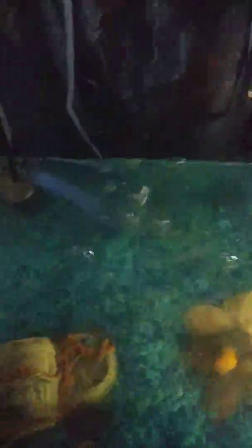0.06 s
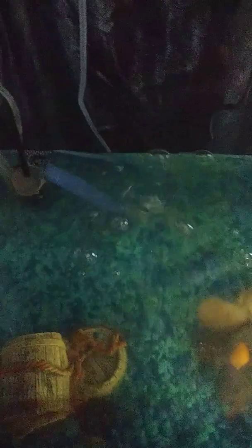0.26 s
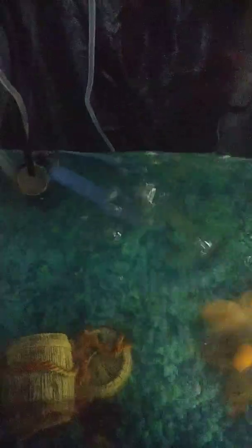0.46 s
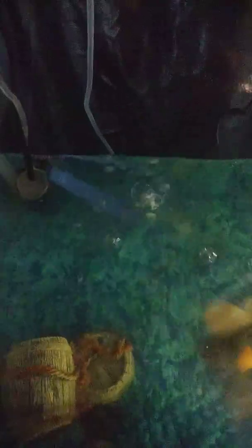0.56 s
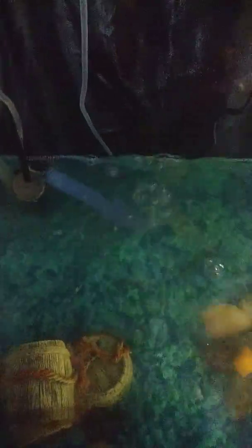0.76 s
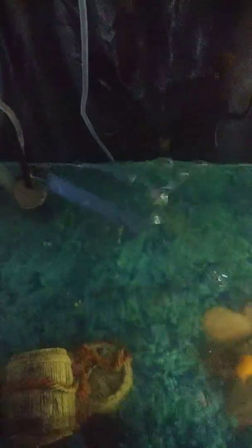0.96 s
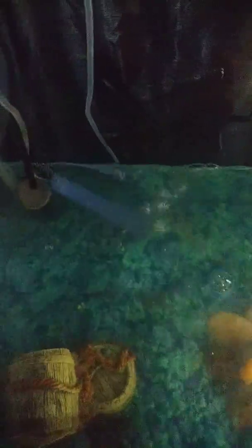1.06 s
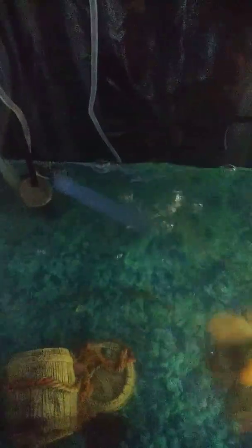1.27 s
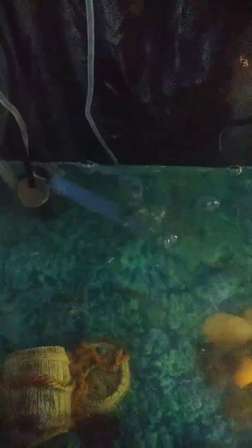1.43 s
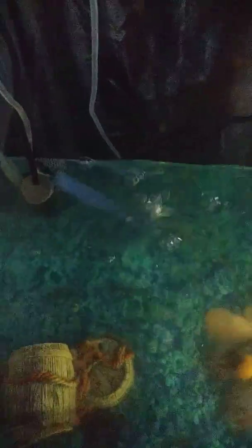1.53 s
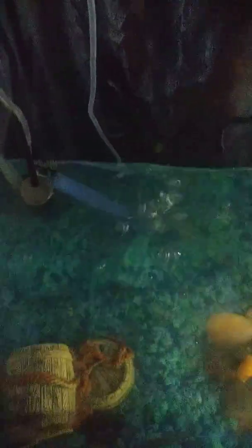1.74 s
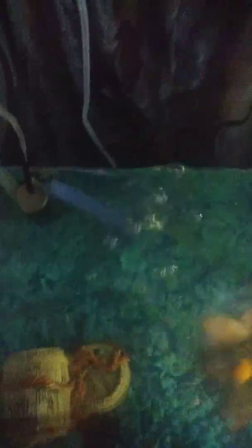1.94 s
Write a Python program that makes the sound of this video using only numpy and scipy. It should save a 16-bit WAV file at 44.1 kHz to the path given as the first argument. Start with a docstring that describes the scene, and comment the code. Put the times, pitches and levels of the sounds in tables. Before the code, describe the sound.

Water gurgles close up in a home fish tank, with air glugging rapidly throughout. From 0.2 seconds it sloshes and bubbles, peaking in a deep plop at 0.4, then eases to a soft trickle after 0.8. A brighter plop and splash come at 1.6, with a few hard drops ticking on the tank between 1.4 and 2 seconds. A faint pump hum and hiss lie underneath in a small room.

```python
"""Water gurgling in a home fish tank, close up. Air glugs through it about 15 times a second, each
pocket a sagging tone that rings the hollow above the water. The surface sloshes twice, with plops,
ringing bubbles and splashes made of tiny bubbles, and trickles on in between. Late on, a few hard
drops tick on the tank. A small room rings lightly; a pump hum and a faint hiss lie underneath."""
import sys
import numpy as np
from scipy import signal
from scipy.fft import rfft, irfft, next_fast_len
from scipy.io import wavfile
from scipy.ndimage import map_coordinates

SR = 44100
rng = np.random.default_rng(int(sys.argv[2]) if len(sys.argv) > 2 else 0)


def unload_wav(signal):
    """Save mono or channel-first audio to the path in sys.argv[1] as 16-bit WAV at rate SR, clipped to [-1, 1]."""
    wavfile.write(
        sys.argv[1],
        SR,
        np.round(np.clip(np.atleast_2d(signal).T, -1, 1) * 32767).astype(np.int16),
    )


N = 88200
BUBBLE_RISE_S, BUBBLE_T60_S = 0.001, 0.038


def amp(db):
    """Decibels to gain."""
    return 10 ** (np.asarray(db) / 20)


def unit(x):
    """Scale to rms 1."""
    return x / np.sqrt(np.mean(x ** 2) + 1e-20)


def along(points, hz):
    """Read a curve of (freq_hz, value) points on a log frequency axis."""
    freqs, values = np.transpose(points)
    return np.interp(np.log(hz + 1), np.log(freqs + 1), values)


def curves(rows):
    """Automation: one value per sample for each column after the time."""
    times, *columns = np.transpose(rows)
    return [np.interp(np.arange(N) / SR, times, column) for column in columns]


def wobble(rate_hz, size):
    """A smooth random curve with rate_hz knots a second."""
    return map_coordinates(rng.standard_normal(2048), [np.arange(size) * rate_hz / SR], mode="mirror")


def filtered(x, response):
    """Equalise x with a gain given as a function of frequency."""
    size = next_fast_len(N + SR // 2)
    return irfft(rfft(x, size) * response(np.fft.rfftfreq(size, 1 / SR)), size)[:N]


def coloured(x, colour):
    """x through an EQ curve of (freq_hz, gain_db) points, at rms 1."""
    return unit(filtered(x, lambda hz: amp(along(colour, hz))))


def add(track, start_s, sound):
    """Mix a sound into the track."""
    part = track[max(0, round(start_s * SR)):][:len(sound)]
    part += sound[:len(part)]


def event_time():
    """Time axis of one short event, in seconds."""
    return np.arange(SR // 4) / SR


def envelope(rise_s, hold_s, t60_s):
    """Attack, hold and exponential release."""
    t = event_time()
    attack = 1 - np.exp(-t / rise_s)
    return attack * np.exp(-np.log(1000) * np.maximum(t - hold_s, 0) / t60_s)


def tone(hz, waver_rad, octaves_per_s=0):
    """A sine that wavers in phase; any glide stops after 45 ms."""
    t = event_time()
    pitch_hz = hz * 2 ** (octaves_per_s * np.minimum(t, .045))
    return np.sin(2 * np.pi * np.cumsum(pitch_hz) / SR + waver_rad * wobble(231.6, len(t)))


def fizz(low_hz, high_hz, decay_cycles, spread_db, count):
    """A swarm of tiny bubbles, each a damped sine of random onset, pitch and size."""
    when, pitch, size = rng.random((count, 3)).T
    hz = low_hz * (high_hz / low_hz) ** pitch[:, None]
    gain = amp(-spread_db * np.log(1 - .98 * size))[:, None]  # many quiet, a few loud
    age = np.arange(SR // 100)
    cycles = hz * age / SR
    grains = gain * np.sin(2 * np.pi * cycles) * np.exp(-cycles / decay_cycles)
    positions = (when * N).astype(int)[:, None] + age
    return np.bincount(positions.ravel(), grains.ravel())[:N]


def glass_walls(x, gain=.42, latest_s=.008, count=9):
    """Quick echoes between the glass walls ripple the spectrum."""
    echoes = sum(np.sign(polarity - .5) * np.roll(x, int(delay * latest_s * SR))
                 for delay, polarity in rng.random((count, 2)))
    return x + gain * echoes


def water_textures():
    """Spray, hollow slap and mist: swarms of middling, large and minute bubbles."""
    # EQ of each swarm: freq_hz, gain_db
    spray_eq = [(1200, -60), (1800, -19.5), (2300, -5.5), (3200, 1.5), (4100, 1), (4900, -2.5), (5800, -15),
                (9000, -45)]
    slap_eq = [(700, -50), (1000, -20), (1350, -0.5), (1600, 0.5), (2100, 3.5), (2800, -19.5), (5000, -61)]
    mist_eq = [(3000, -46), (5200, -4), (6500, -4), (8000, -6), (9600, -15), (12000, -17), (14000, -9),
               (15800, -17)]
    spray = glass_walls(fizz(1908.5, 5784, decay_cycles=14, spread_db=3, count=10000))
    slap = glass_walls(fizz(841, 2375, decay_cycles=4.8, spread_db=3, count=3000))
    mist = glass_walls(fizz(5010, 18000, decay_cycles=6.2, spread_db=7.5, count=8000))
    return coloured(spray, spray_eq), coloured(slap, slap_eq), coloured(mist, mist_eq)


def trickle(crossover_hz=3280):
    """A fluttering wash of tiny bubbles that swells and brightens with each slosh, then settles."""
    # fader moves of the wash: time_s, dark_spray_db, bright_spray_db, slap_db, mist_db
    faders = [(0.0, -73, -79, -71, -74.5), (0.14, -66, -78, -92, -82.5), (0.27, -66, -54.5, -54, -79.5),
              (0.39, -58, -50.5, -52, -64.5), (0.46, -53, -46.5, -62, -59.5),
              (0.54, -53.5, -57.5, -65, -60.5), (0.68, -54.5, -59, -79, -71.5),
              (0.77, -56.5, -58, -61, -77), (0.89, -55.5, -59.5, -85, -72),
              (0.96, -59.5, -57, -66.5, -66.5), (1.09, -61.5, -68, -83.5, -78),
              (1.16, -66, -69.5, -84, -90), (1.35, -62.5, -97, -74.5, -75.5),
              (1.41, -60.5, -66.5, -94, -79.5), (1.53, -66, -63.5, -78.5, -68),
              (1.6, -56, -57, -49.5, -57.5), (1.73, -60.5, -57.5, -57, -74),
              (1.82, -64.5, -59.5, -59.5, -72), (2.0, -58, -53.5, -53.5, -62.5)]
    # trim on each fader: dark_spray_db, bright_spray_db, slap_db, mist_db
    trims = [1, 1, 0, 0]
    flutter_db = 1.2 * wobble(rate_hz=70, size=N)
    spray, slap, mist = water_textures()
    dark_spray = filtered(spray, lambda hz: 1 / (1 + (hz / crossover_hz) ** 20))
    layers = unit(dark_spray), unit(spray - dark_spray), slap, mist
    return sum(amp(level_db + trim_db + flutter_db) * layer
               for level_db, trim_db, layer in zip(curves(faders), trims, layers))


def pump():
    """The pump's mains hum, drifting in phase, and the low murmur of moving water in the tank."""
    # partials of the hum: pitch_hz, rms_db
    partials = [(60, -86.5), (120, -85.5), (240, -64), (480, -72), (630, -72.5), (690, -69.5)]
    # EQ of the murmur: freq_hz, gain_db
    murmur_eq = [(25, -28.5), (60, -49), (100, -28), (150, -31.5), (220, 5), (290, -25), (380, -2),
                 (540, -13), (670, 0), (800, -20.5), (1100, -29), (1500, -60), (4000, -75.5)]
    # swell of the murmur: time_s, rms_db
    murmur_fader = [(0, -62.5), (.18, -65.5), (.25, -51), (.6, -50), (.85, -62.5), (1.4, -59), (2, -67.5)]
    t = np.arange(N) / SR
    hum = sum(amp(rms_db) * np.sqrt(2) * np.sin(2 * np.pi * hz * t + 0.92 * wobble(6.1, N))
              for hz, rms_db in partials)
    murmur = amp(curves(murmur_fader)[0]) * coloured(rng.standard_normal(N), murmur_eq)
    return hum + murmur


def hiss(level_db=-85.5):
    """Faint, even microphone hiss."""
    # EQ of the hiss: freq_hz, gain_db
    hiss_eq = [(1000, -35), (6000, -6), (9500, -10), (13000, 3), (16000, -2)]
    return amp(level_db) * coloured(rng.standard_normal(N), hiss_eq)


def glugs(rise_s=0.00339, hold_s=0.0094, sag_octaves_per_s=6.1, thump_db=-15.5):
    """Each pocket of air sags in pitch and rings the hollow; water thumps softly shut behind it."""
    # pockets of air: time_s, level_db, pitch_hz (at the end of the hold)
    pockets = [(0.04, -49.5, 290), (0.105, -44, 377), (0.172, -41.5, 398), (0.229, -32, 414),
               (0.275, -31, 459), (0.301, -31, 475), (0.33, -29, 388), (0.482, -41.5, 407),
               (0.546, -29.5, 405), (0.599, -38, 554), (0.665, -46, 404), (0.737, -43, 401),
               (0.801, -42.5, 415), (0.867, -45, 410), (0.939, -45.5, 385), (1.004, -45.5, 366),
               (1.077, -45, 387), (1.138, -46, 357), (1.206, -50, 400), (1.266, -49.5, 415),
               (1.343, -52, 405), (1.407, -47, 356), (1.539, -51, 418), (1.608, -48.5, 347),
               (1.668, -50, 415), (1.742, -45.5, 392), (1.808, -48.5, 380), (1.876, -45, 396),
               (1.937, -40.5, 406)]
    # modes of the air space over the water: pitch_hz, gain_db, t60_s
    hollow_modes = [(160, -29, .09), (218.4, -6, 0.12), (696, -16, 0.091)]
    # EQ of the thump: freq_hz, gain_db
    thump_eq = [(60, -58), (110, -11.5), (160, -5.5), (230, -6), (320, 0), (480, -4.5), (700, -13.5),
                (900, -19), (1150, -16.5), (1600, -66), (4000, -92)]
    tones, thump_shape = np.zeros((2, N))
    for time_s, level_db, pitch_hz in pockets:
        start_hz = pitch_hz * 2 ** (sag_octaves_per_s * hold_s)
        pocket = tone(start_hz, waver_rad=0.29, octaves_per_s=-sag_octaves_per_s)
        pocket *= envelope(rise_s, hold_s, t60_s=0.042)
        hollow = sum(amp(gain_db) * tone(hz, waver_rad=0.085) * envelope(rise_s, 0, t60_s)
                     for hz, gain_db, t60_s in hollow_modes)
        add(tones, time_s - rise_s, amp(level_db) * (pocket + hollow))
        add(thump_shape, time_s, amp(level_db + thump_db) * envelope(rise_s, hold_s, t60_s=0.17))
    return tones + thump_shape * coloured(rng.standard_normal(N), thump_eq)


def bubbles():
    """Single bubbles ring briefly, a little unsteady in pitch and level."""
    # single bubbles: start_s, pitch_hz, level_db, hold_s
    pings = [(0.042, 159, -56, 0.025), (0.042, 3580, -50, 0.0023), (0.056, 2505, -46, 0.0075),
             (0.063, 1479, -50.5, 0.014), (0.196, 2273, -47, 0.015), (0.217, 725, -33, 0.002),
             (0.214, 1170, -42, 0.026), (.215, 1733, -42, 0.012), (.216, 3575, -35.5, 0.004),
             (0.229, 199, -49, .02), (.246, 4056, -38.5, .008), (0.332, 712, -38, 0.0052),
             (0.336, 3130, -32.5, .01), (0.365, 712, -39.5, 0.01), (.364, 2920, -33, 0.0057),
             (0.523, 1407, -24, 0.0065), (0.524, 1000, -36, 0.01), (0.52, 750, -43, 0.0052),
             (.552, 1395, -68, 0.013), (0.59, 710, -41, .008), (0.667, 727, -50.5, 0.032),
             (0.721, 680, -41, 0.0091), (0.719, 3120, -40, 0.004), (1.319, 1370, -61.5, 0.011),
             (1.558, 2860, -41, .009), (1.616, 1496, -38.5, 0.014), (1.697, 1860, -43, 0.0043),
             (1.767, 1320, -60.5, 0.08), (1.869, 1350, -38.5, 0.0084), (1.873, 1450, -35, 0.0031),
             (1.892, 2430, -54, .01)]
    out = np.zeros(N)
    for start_s, pitch_hz, level_db, hold_s in pings:
        ring = tone(pitch_hz, waver_rad=.35) * envelope(BUBBLE_RISE_S, hold_s, BUBBLE_T60_S)
        shimmer_db = 2.2 * wobble(rate_hz=160, size=len(ring))
        add(out, start_s, amp(level_db + shimmer_db) * ring)
    return out


def splashes(spray_trim_db=-12.5, slap_trim_db=-11.5, mist_trim_db=-2.5):
    """Short bursts of tiny bubbles where the surface breaks."""
    # breaks of the surface: start_s, spray_db, slap_db, mist_db, hold_s
    bursts = [(0.056, -42, -41.5, -79, 0.015), (0.102, -45.5, -58, -66, 0.014),
              (0.1926, -38.5, -66, -72, 0.011), (0.2136, -32, -39.5, -82, 0.0064),
              (0.2423, -31, -38.5, -65, 0.0072), (0.298, -31, -46, -56, 0.0044),
              (0.3154, -30, -39.5, -68, 0.003), (0.332, -23, -34, -48.5, 0.0059),
              (0.362, -25.5, -45, -53, 0.0052), (0.4236, -15, -20.5, -51.5, 0.012),
              (0.5207, -27, -30.5, -49, 0.0066), (0.576, -28.5, -31, -54, 0.005),
              (0.5968, -23.5, -39.5, -53, 0.0042), (0.6246, -37, -45, -48.5, 0.0076),
              (0.659, -37, -42.5, -58.5, 0.017), (0.722, -44, -55, -62.5, 0.018),
              (0.7627, -35.5, -43.5, -65.5, 0.0081), (0.9139, -41, -72, -67, 0.0046),
              (0.9417, -34, -69, -60, 0.003), (1, -38.5, -64, -68.5, 0.012),
              (1.03, -43.5, -80, -66, 0.0062), (1.07, -42.5, -60, -77, 0.0078),
              (1.3428, -40.5, -57.5, -65.5, 0.014), (1.473, -43, -80, -51.5, 0.01),
              (1.521, -34, -82, -57, 0.016), (1.562, -27.5, -50, -54, 0.014),
              (1.5895, -16.5, -38, -38.5, 0.01), (1.694, -36, -41, -57, 0.008),
              (1.737, -31, -47.5, -61, 0.0042), (1.7597, -32, -74, -63.5, 0.007),
              (1.7847, -35, -49, -55, 0.013), (1.8646, -29, -31.5, -57, 0.011),
              (1.8918, -28.5, -37, -63, 0.0039), (1.9182, -29.5, -59, -51, 0.012)]
    spray, slap, mist = np.zeros((3, N))
    for start_s, spray_db, slap_db, mist_db, hold_s in bursts:
        shape = envelope(rise_s=.0004, hold_s=hold_s, t60_s=0.083)
        add(spray, start_s, amp(spray_db + spray_trim_db) * shape)
        add(slap, start_s, amp(slap_db + slap_trim_db) * shape)
        add(mist, start_s, amp(mist_db + mist_trim_db) * shape)
    return sum(gain * texture for gain, texture in zip((spray, slap, mist), water_textures()))


def plops(deep_s=.4222, bright_s=1.5912, rise_s=.0006):
    """Two big pockets of air collapse, one deep and one bright, each a cluster of unsteady modes."""
    # modes of each pocket: pitch_hz, level_db, hold_s, t60_s
    deep_modes = [(534.5, -31.5, 0.011, .06), (628, -24, 0.0085, 0.1), (710.7, -30.5, 0.027, 0.055),
                  (1171, -26, 0.0034, 0.12), (1280, -21, 0.002, 0.048), (1371, -24.5, .003, 0.095),
                  (1569, -32, 0.023, 0.063), (2276, -19.5, 0.01, 0.021), (2462, -26, 0.018, 0.065),
                  (3272, -30, 0.0074, .05), (3360, -27.5, 0.0056, .08)]
    bright_modes = [(1810, -40, 0.012, .04), (1984, -27, 0.0086, 0.029), (3122, -29.5, .006, 0.034),
                    (3450, -29.5, 0.0068, .05), (3922, -25.5, 0.0099, .05), (4420, -25.5, 0.004, 0.046),
                    (4320, -29.5, 0.005, 0.098)]
    out = np.zeros(N)
    for start_s, modes in (deep_s, deep_modes), (bright_s, bright_modes):
        for pitch_hz, level_db, hold_s, t60_s in modes:
            ring = tone(pitch_hz, waver_rad=.6) * envelope(rise_s, hold_s, t60_s)
            add(out, start_s, amp(level_db) * ring)
    return out


def gurgles():
    """Pockets of air rise in pitch as they shrink; churning water roughens their tone."""
    # shrinking pockets: start_s, start_pitch_hz, glide_octaves_per_s, level_db, hold_s
    pockets = [(.599, 512, 4.9, -37.5, 0.032), (.632, 713, 1.4, -34, 0.023),
               (0.727, 817, 7.1, -54.5, 0.049), (1.315, 441, 4, -51, 0.042),
               (1.346, 546.6, 8.8, -48.5, 0.039), (1.365, 900, 6.5, -56.5, 0.049)]
    out = np.zeros(N)
    for start_s, pitch_hz, glide, level_db, hold_s in pockets:
        ring = tone(pitch_hz, waver_rad=.8, octaves_per_s=glide)
        ring *= envelope(BUBBLE_RISE_S, hold_s, BUBBLE_T60_S)
        churn = 1 + .6 * wobble(rate_hz=260, size=len(ring))
        add(out, start_s, amp(level_db) * churn * ring)
    return out


def ticks(rise_s=0.00036, crack_db=-5, crack_t60_s=0.0019):
    """Hard drops strike the tank: a brief crack of noise and a thin ring."""
    # drops on the tank: start_s, level_db
    drops = [(1.4417, -33), (1.6284, -19.5), (1.647, -28), (1.651, -35), (1.8143, -20), (1.8359, -30),
             (1.974, -21)]
    # modes that a drop rings: pitch_hz, gain_db, t60_s
    modes = [(1380, -55, 0.05), (3010, -6.5, 0.013), (4510, -34, 0.056), (4770, 6, 0.0048),
             (5020, -7, 0.015), (7530, 0, 0.0018), (10620, -35.5, 0.087), (12410, -33, .04),
             (13740, -35, 0.025), (15100, -31, 0.027)]
    out = np.zeros(N)
    for start_s, level_db in drops:
        ring = sum(amp(gain_db) * tone(hz, waver_rad=0.32) * envelope(rise_s, 0, t60_s)
                   for hz, gain_db, t60_s in modes)
        crack = amp(crack_db) * envelope(rise_s, 0, crack_t60_s) * rng.standard_normal(len(ring))
        add(out, start_s, amp(level_db) * (ring + crack))
    return out


def room(x, wet_db=-12):
    """A small room's reverb: a tail of noise whose treble dies first."""
    # decay of the room: freq_hz, t60_s
    decay_times = [(200, 0.32), (1500, 0.26), (5000, 0.073), (14000, .12)]
    hz, t, noise = signal.stft(rng.standard_normal(SR // 2), SR, nperseg=256)
    decay = np.exp(-np.log(1000) * t / along(decay_times, hz)[:, None])
    tail = signal.istft(noise * decay, SR, nperseg=256)[1]
    return amp(wet_db) * signal.fftconvolve(x, tail / np.linalg.norm(tail))[:N]


def scene(low_cut_hz=122):
    """The water's hits, low-cut and sent to the room, over a dry bed of trickle, pump and hiss."""
    water = glugs() + bubbles() + gurgles() + plops() + splashes() + ticks()
    low_cut = signal.butter(3, low_cut_hz, btype="high", fs=SR, output="sos")
    water = signal.sosfilt(low_cut, water)
    return (water + room(water) + trickle() + pump() + hiss())[None]


def record(dry, top_hz=16200):
    """A brick-wall high cut on the whole mix."""
    return np.array([filtered(channel, lambda hz: hz < top_hz) for channel in dry])


dry = scene()
out = record(dry)
unload_wav(out)
```